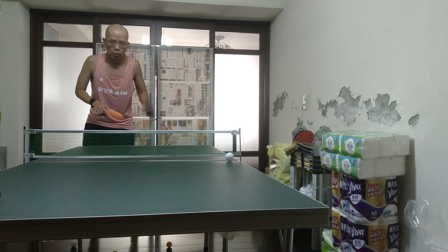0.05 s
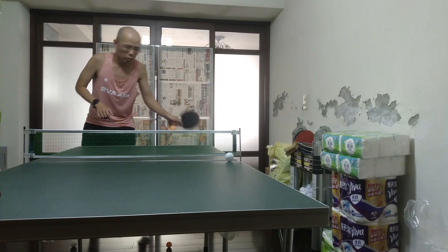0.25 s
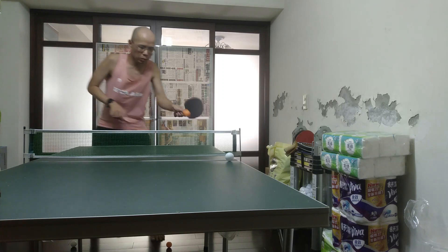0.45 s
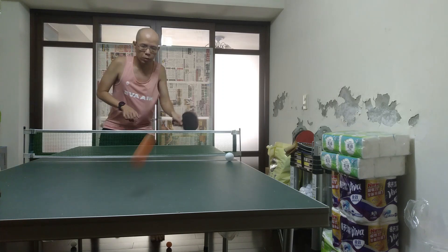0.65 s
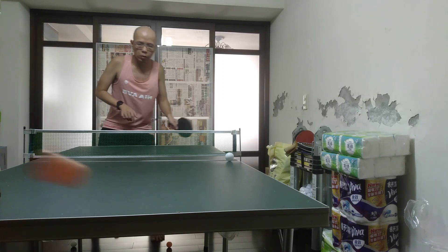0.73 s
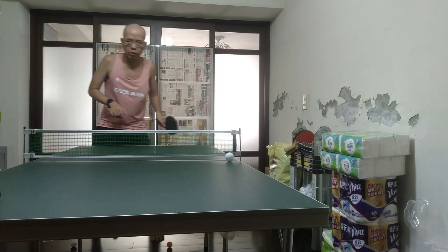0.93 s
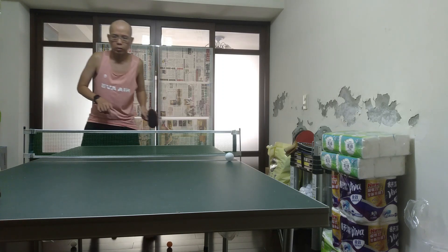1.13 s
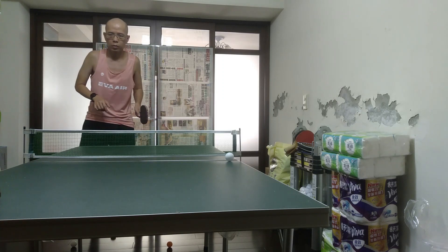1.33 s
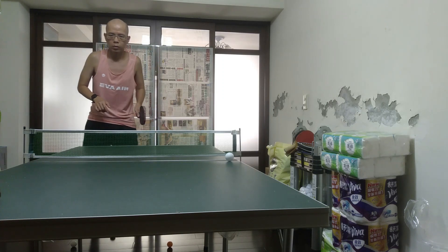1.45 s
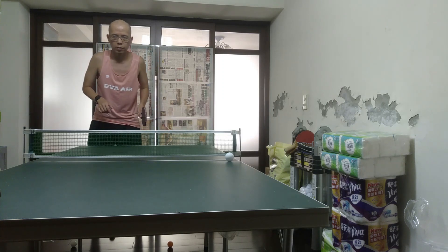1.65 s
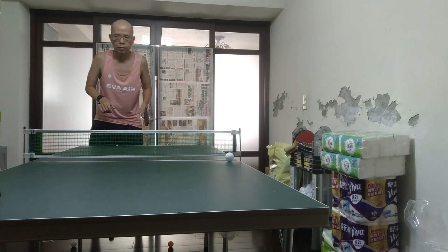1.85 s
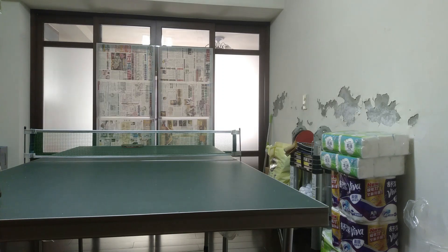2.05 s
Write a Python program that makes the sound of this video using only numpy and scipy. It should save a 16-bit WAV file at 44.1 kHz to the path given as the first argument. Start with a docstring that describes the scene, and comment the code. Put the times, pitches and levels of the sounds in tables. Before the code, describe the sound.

A table tennis ball clicks on the table, is struck by a bat and bounces again. It knocks loudly on a board near the microphone, pings off a metal post and bounces on in a small, echoing room.

```python
"""Table tennis practice in a small, hard-walled room, on one microphone close to a board.
The hollow ball clicks on the table, a bat strikes it and it bounces again. About a second in it knocks
against the board, then pings off a metal post and bounces on, with fainter taps between.
Every contact sets the room ringing; soft footfalls and low room noise lie underneath."""
import sys
import numpy as np
from scipy import signal
from scipy.fft import rfft, irfft, next_fast_len
from scipy.io import wavfile
from scipy.ndimage import map_coordinates

SR = 44100
rng = np.random.default_rng(int(sys.argv[2]) if len(sys.argv) > 2 else 0)


def digitize_waveform(pressure):
    """Quantize a signal to 16-bit integers and store it at the path in sys.argv[1].

    Rows of a 2-D input are taken as channels; values are limited to [-1, 1].
    """
    field = np.atleast_2d(pressure).T
    bounded = np.clip(field, -1, 1)
    quanta = np.round(bounded * 32767).astype(np.int16)
    wavfile.write(sys.argv[1], SR, quanta)


N = 92610
T = np.arange(SR) / SR
HZ = np.fft.rfftfreq(8192, 1 / SR)

# ball on the table: start_s, level_db, contact_ms, notch_depth (0-1), treble_db, bass_db, direct_db
BOUNCES = [(-.04, -31.5, 0.61, 0.93, -0.5, 2.5, -14), (.163, -43, 0.61, 1, -2, -10, -14),
           (0.2286, -28, 0.6, 0.96, 3.5, 6, -22), (.409, -41, 0.54, 0.9, -2, 5, -11),
           (0.6656, -37, 0.61, 1, -0.5, 0.5, -14), (0.745, -29.5, 0.616, 0.96, -1, -3, -13),
           (0.834, -38.5, .6, 1, -6, -10, -24), (1.227, -41.5, .6, 0.74, 2, -10, -24),
           (1.544, -40, .6, 0.91, -8.5, -12, -21), (1.627, -29.5, 0.628, .8, -2, -3, -11.5),
           (1.719, -30, .615, 0.2, -4.5, 2, -6), (1.98, -42.5, .6, 0.97, -2.5, -0.5, -17)]
# colour of each struck thing: frequency_hz, relative_db
TABLE_COLOUR = [(40, -28.5), (90, -5.5), (230, -0.5), (400, -3.5), (650, -3), (1050, -0.5), (1700, -5),
                (2200, -8), (3300, -13.5), (5000, -18), (7000, -18.5), (10000, -21), (12500, -28.5),
                (15500, -44.5)]
BAT_COLOUR = [(50, -20.5), (130, -7.5), (350, -15), (780, -16), (920, -7.5), (1030, 5), (1200, -4.5),
              (1550, -13), (1980, -1), (2500, -13), (3300, -17), (5000, -32), (7000, -24.5), (10000, -31.5),
              (15500, -53)]
BOARD_COLOUR = [(50, -24.5), (120, -16), (210, -5), (310, -6.5), (420, -2), (560, -1), (720, -4), (1000, 0),
                (1400, -7), (2000, -12), (2700, -20), (5000, -28), (7500, -28.5), (10500, -31.5),
                (15500, -54.5)]
POST_COLOUR = [(45, -19), (85, 0), (180, 0), (330, 2.5), (520, -6), (900, 0), (1250, -0.5), (2300, -11),
               (3300, -8.5), (5300, -9.5), (7500, -13), (9500, -19.5), (12500, -21.5), (15500, -37)]
# tones that linger after a blow: pitch_hz, relative_db, t60_s
BAT_MODES = [(1024, -1.5, 0.38), (1036, -6, .45), (2105, -16.5, .25)]
BOARD_MODES = [(116, -10.5, .7), (206.6, -9, 0.53), (401, -5.5, .5), (515, -6.5, 0.26), (565, 1.5, 0.41),
               (694, -8, 0.3), (1025, -7, 0.35), (1147, -11, .45), (1582, -13.5, .4)]
POST_MODES = [(87.6, -4.5, .38), (175, -2.5, 0.44), (5320, -8.5, 0.53), (8624, -14, 0.49)]
# how long the room rings: frequency_hz, t60_s
ROOM_DECAY = [(80, 0.88), (250, 0.62), (600, 0.55), (1200, 0.73), (2500, 0.65), (5000, .68), (9000, 0.72),
              (15000, 0.72)]
# the player's steps: start_s, level_db
FOOTFALLS = [(0.271, -42), (.43, -38), (0.739, -45), (1.784, -44.5)]
# colour of a step and of the room noise: frequency_hz, relative_db
STEP_COLOUR = [(25, -29), (50, 0.5), (90, -1), (140, 3), (220, -20), (500, -44.5), (2000, -69)]
NOISE_COLOUR = [(25, -24.5), (60, 6), (130, -7.5), (280, 2), (600, -10), (1200, -2), (2500, -13.5),
                (5000, -23), (8400, -19.5), (10000, -23), (15500, -42.5)]


def table_bounces(treble_hz=3000, bass_hz=510):
    """Bounces on the table top, brighter or fuller with where and how hard they land."""
    treble_shelf = HZ ** 2 / (HZ ** 2 + treble_hz ** 2)
    bass_shelf = bass_hz ** 2 / (HZ ** 2 + bass_hz ** 2)
    track = np.zeros(N)
    for start_s, level_db, contact_ms, notch_depth, treble_db, bass_db, direct_db in BOUNCES:
        colour_db = along(TABLE_COLOUR, HZ) + treble_db * treble_shelf + bass_db * bass_shelf
        colour_db += ball_contact(contact_ms, notch_depth) + ball_shell(peak_db=12)
        click = room_click(direct_db, walls_db=-11, hold_s=0.014)
        track += placed(amp(level_db) * coloured(click, colour_db), start_s)
    return track


def bat_stroke():
    """The bat meets the hollow ball and its blade rings briefly."""
    colour_db = along(BAT_COLOUR, HZ) + ball_shell(peak_db=9)
    ring = ringing(BAT_MODES)
    click = room_click(direct_db=-11.5, walls_db=-7, hold_s=0.005)
    return coloured(click, colour_db) + ring


def board_knock():
    """The ball knocks on the board near the microphone, which rings in low and middle tones."""
    colour_db = along(BOARD_COLOUR, HZ) + ball_shell(peak_db=8)
    colour_db += ball_contact(contact_ms=0.608, notch_depth=0.8)
    ring = ringing(BOARD_MODES)
    click = room_click(direct_db=-16, walls_db=-16.5, hold_s=0.0517)
    return coloured(click, colour_db) + ring


def post_ping():
    """The ball glances off metal, leaving two low tones and two high ones."""
    ring = ringing(POST_MODES)
    click = room_click(direct_db=-15, walls_db=-10, hold_s=-0.0241)  # the tail starts already fading
    return coloured(click, along(POST_COLOUR, HZ)) + ring


def ball_contact(contact_ms, notch_depth):
    """Spectrum in dB of the ball's push on something hard: its length cuts regular treble notches."""
    cycles = np.maximum(HZ * contact_ms / 1000, 1)
    return 10 * np.log10(1 - min(notch_depth, 0.98) * np.sin(np.pi * cycles) ** 2)


def ball_shell(peak_db, pitch_hz=8420, half_width_hz=168):
    """Spectrum in dB of the hollow ball's own resonance."""
    return peak_db / (1 + ((HZ - pitch_hz) / half_width_hz) ** 2)


def ringing(modes, rise_cycles=1.6, waver=0.53, waver_per_s=60):
    """A struck thing's own tones build up and die away, wavering in level and phase."""
    ring = np.zeros(SR)
    for pitch_hz, relative_db, t60_s in modes:
        knots = rng.standard_normal((2, 256))
        swell, drift = (waver * map_coordinates(row, [T * waver_per_s], mode="wrap") for row in knots)
        phase = 2 * np.pi * pitch_hz * T
        envelope = (1 - np.exp(-T * pitch_hz / rise_cycles)) * amp(relative_db - 60 * T / t60_s)
        ring += envelope * ((1 + swell) * np.sin(phase) + drift * np.cos(phase))
    return ring


def room_click(direct_db, walls_db, hold_s, echoes=16, scatter_s=0.0012, scatter_share=0.46):
    """A click at the microphone: direct sound and wall echoes, set against a tail that holds, then dies."""
    hz, time_s, spectrum = signal.stft(rng.standard_normal(SR), SR, nperseg=256)
    decay = amp(-60 * np.maximum(time_s - hold_s, 0) / along(ROOM_DECAY, hz)[:, None])
    tail = signal.istft(spectrum * decay, SR, nperseg=256)[1][:SR]
    walls = np.zeros(SR)
    delays_s = rng.uniform(0.002, 0.024, echoes)
    walls[(delays_s * SR).astype(int)] = amp(walls_db) * rng.choice([-1, 1], echoes) / np.sqrt(echoes)
    # nearby surfaces smear part of the direct sound
    scatter = rng.standard_normal(SR) * np.exp(-T / scatter_s)
    scatter /= np.linalg.norm(scatter)
    direct = np.sqrt(1 - scatter_share) * signal.unit_impulse(SR) + np.sqrt(scatter_share) * scatter
    # the direct sound keeps treble that the walls soak up
    direct += 0.66 * signal.lfilter(*signal.butter(1, 2000, "high", fs=SR), direct)
    return tail + np.linalg.norm(tail) * (amp(direct_db) * direct + walls)


def footfalls(rise_s=0.0073, t60_s=0.62):
    """Dull steps that boom briefly in the room."""
    envelope = (1 - np.exp(-T / rise_s)) * amp(-60 * T / t60_s)
    track = np.zeros(N)
    for start_s, level_db in FOOTFALLS:
        rumble = coloured(rng.standard_normal(SR), along(STEP_COLOUR, HZ))
        track += placed(amp(level_db) * envelope * rumble, start_s)
    return track


def room_noise(level_db=-50.5):
    """Steady, low room tone behind the play."""
    return amp(level_db) * coloured(rng.standard_normal(N + SR), along(NOISE_COLOUR, HZ))[SR:]


def amp(db):
    """Decibels to gain."""
    return 10 ** (np.asarray(db) / 20)


def along(points, hz):
    """A table of frequency_hz, value read on a log frequency axis."""
    points_hz, values = np.transpose(points)
    return np.interp(np.log(hz + 1), np.log(points_hz + 1), values)


def placed(sound, start_s):
    """The sound starting at start_s on an empty track."""
    start = round(start_s * SR)
    return np.pad(sound, (max(start, 0), N))[max(-start, 0):][:N]


def coloured(sound, colour_db):
    """The sound through a causal filter of unit energy, shaped like colour_db over HZ."""
    cepstrum = irfft(np.log(np.maximum(amp(colour_db), 1e-6)))
    half = len(cepstrum) // 2
    causal = np.r_[cepstrum[0], 2 * cepstrum[1:half], np.zeros(half)]
    pulse = irfft(np.exp(rfft(causal)))
    return signal.fftconvolve(sound, pulse / np.linalg.norm(pulse))[:len(sound)]


def scene():
    """All contacts, the player's feet and the room noise at one microphone."""
    bat = placed(amp(-24.5) * bat_stroke(), start_s=0.4389)
    board = placed(amp(-19.5) * board_knock(), start_s=0.9711)
    post = placed(amp(-27) * post_ping(), start_s=1.3582)
    return (table_bounces() + bat + board + post + footfalls() + room_noise())[None]


def record(dry, low_cut_hz=28, top_hz=15900, stop_s=2.009):
    """The recorder drops the deepest bass and the highest treble; the sound stops just before the end."""
    low_cut = signal.butter(4, low_cut_hz, "high", fs=SR, output="sos")
    live = signal.sosfilt(low_cut, dry) * (np.arange(N) < stop_s * SR)
    size = next_fast_len(N + SR)
    passband = np.fft.rfftfreq(size, 1 / SR) < top_hz
    return irfft(rfft(live, size) * passband, size)[:, :N]


dry = scene()
out = record(dry)
digitize_waveform(out)
```